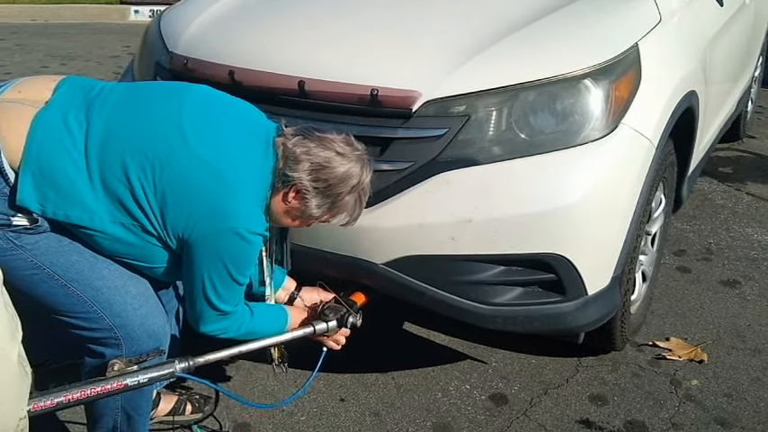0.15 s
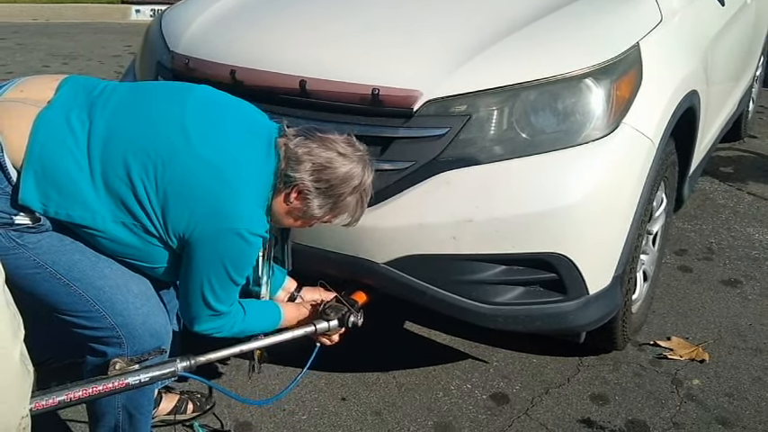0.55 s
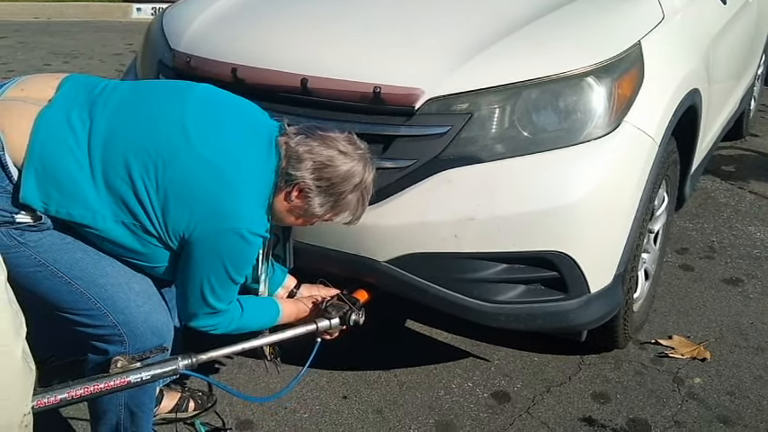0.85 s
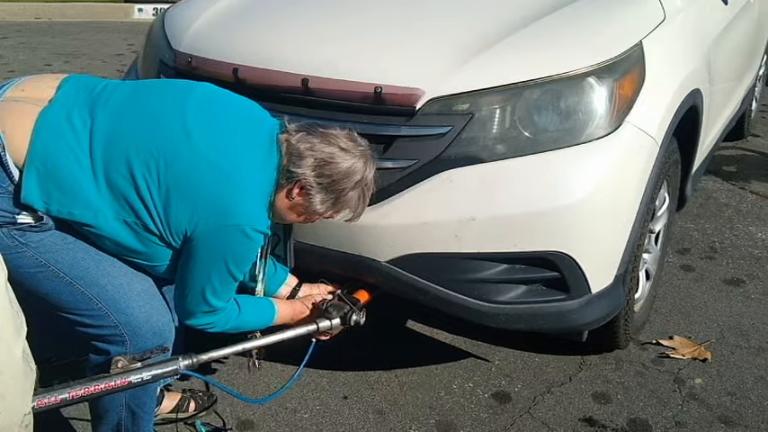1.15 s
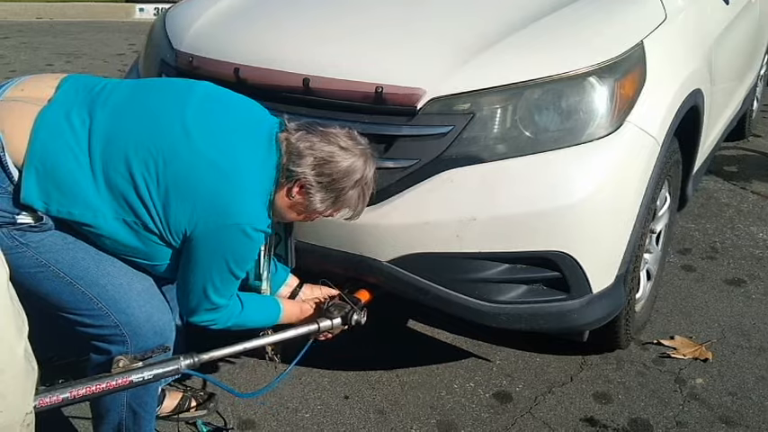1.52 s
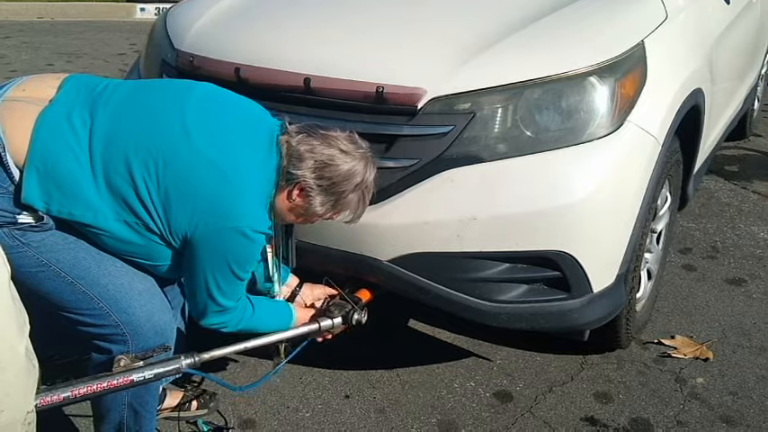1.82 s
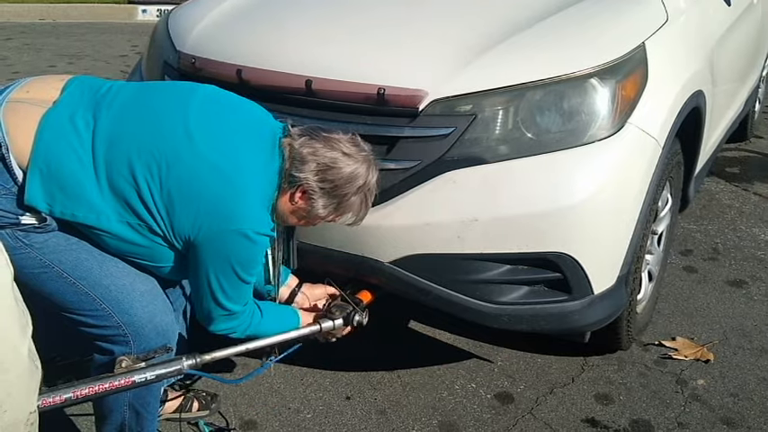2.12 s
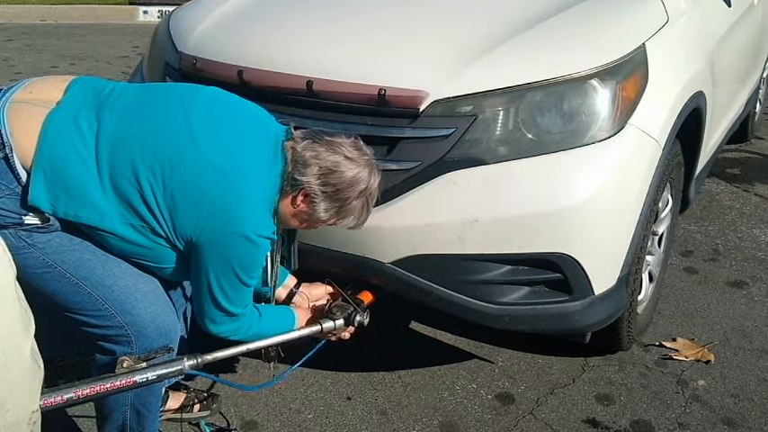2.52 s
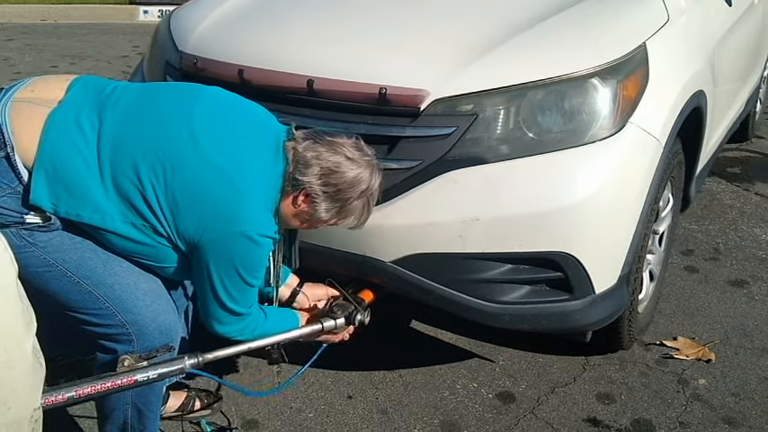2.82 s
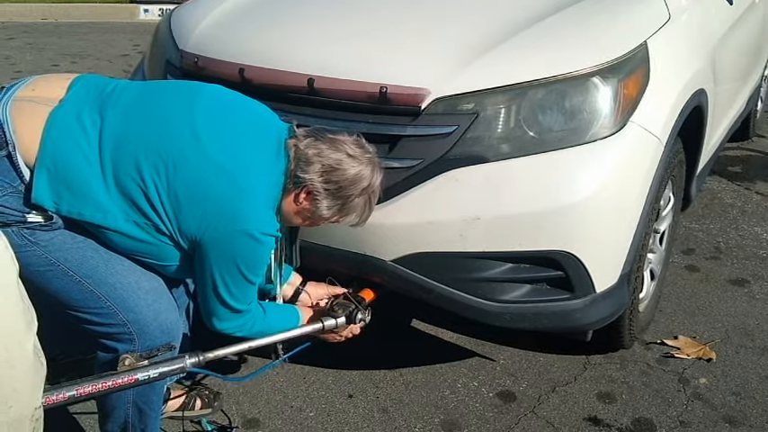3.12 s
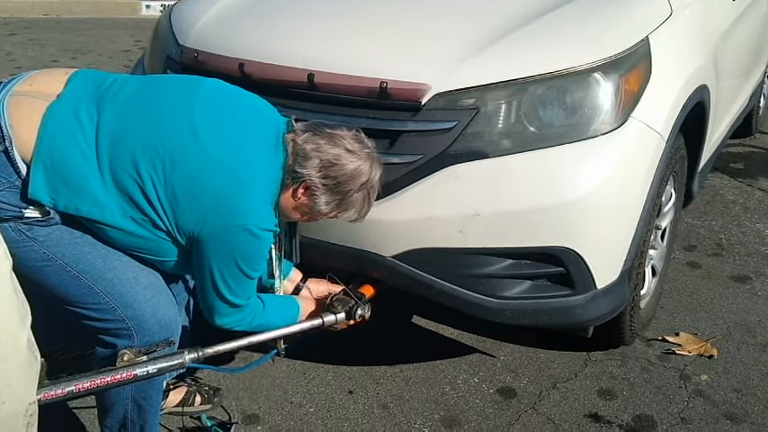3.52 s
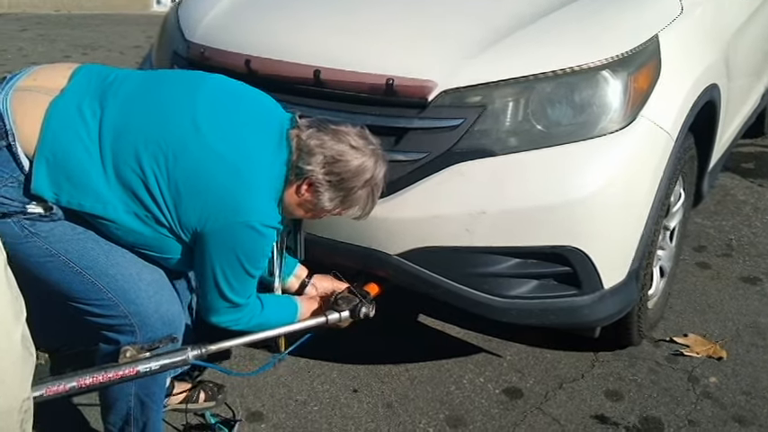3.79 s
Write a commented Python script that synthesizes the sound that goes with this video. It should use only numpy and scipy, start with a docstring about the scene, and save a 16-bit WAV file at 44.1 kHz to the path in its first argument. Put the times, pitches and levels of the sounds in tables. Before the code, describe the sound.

Metal hardware clinks and rattles as a cable hook is fastened to a tow bar near traffic.

```python
"""A steel cable and its hook are fastened to a tow bar at the front of a parked car, outdoors.
From the start the hollow bar knocks and rattles in its mount (modes plus filtered random contacts), the
cable ticks (noise bursts) and air puffs at the microphone; then birds whistle (glides) and the catch snaps
(noise plus partials). Hook clinks (click plus partials), scrapes and rubs follow; late on, the catch snaps
and the bar knocks again. Throughout: traffic wash (shaped noise) and hum (wavering sines)."""
import sys
import numpy as np
from scipy import signal
from scipy.fft import rfft, irfft
from scipy.io import wavfile
from scipy.ndimage import uniform_filter1d

SR = 44100
rng = np.random.default_rng(int(sys.argv[2]) if len(sys.argv) > 2 else 0)


def unload_audio(sound):
    """Save the sound as a 16-bit wav file, at the path given as the first command line argument."""
    columns = np.transpose(np.atleast_2d(sound))
    # keep every value between -1 and 1, then stretch to whole-number steps
    steps = np.round(np.clip(columns, -1, 1) * 32767)
    wavfile.write(sys.argv[1], SR, steps.astype(np.int16))


N = 174195


def amp(db):
    """Decibels to gain."""
    return 10 ** (np.asarray(db) / 20)


def unit(x):
    """Scales to rms 1."""
    return x / np.sqrt(np.mean(x ** 2) + 1e-20)


def read(points, hz):
    """Interpolates a (frequency, value) table on a log-frequency axis."""
    f, value = np.transpose(points)
    return np.interp(np.log(hz + 1), np.log(f + 1), value)


def add(mix, start_s, sound, pan_db=0):
    """Adds a sound at its time; positive pan_db favours the left."""
    sides = unit(amp([[pan_db / 2], [-pan_db / 2]]))
    part = mix[:, max(round(start_s * SR), 0):][:, :sound.shape[-1]]
    part += (sides * sound)[:, :part.shape[1]]


def noise(colour, size, likeness=0.31):
    """Two partly alike channels of coloured noise, rms 1."""
    hz = np.fft.rfftfreq(size, 1 / SR)
    a, b = rfft(rng.standard_normal((2, size)))
    c = np.clip(likeness, 0, 1)
    pair = np.array([a, c * a + np.sqrt(1 - c * c) * b])
    return unit(irfft(pair * amp(read(colour, hz)), size))


def drift(rate_hz):
    """Slow random motion over the whole scene, rms 1."""
    hz = np.fft.rfftfreq(N, 1 / SR)
    return unit(irfft(rfft(rng.standard_normal(N)) / (1 + (hz / rate_hz) ** 4), N))


def waver(size, rate_hz):
    """A short stretch of slow complex random motion, rms 1."""
    hz = np.fft.fftfreq(size, 1 / SR)
    z = rng.standard_normal(size) + 1j * rng.standard_normal(size)
    z = np.fft.ifft(np.fft.fft(z) * np.exp(-(hz / rate_hz) ** 2))
    return z / np.sqrt(np.mean(abs(z) ** 2))


def crack(colour, t60_s):
    """The dense, quickly dying vibration of one contact."""
    t = np.arange(SR // 2) / SR
    return noise(colour, len(t)) * amp(-60 * t / t60_s)


PORT_PHASE_RAD = 1.0  # largest random phase offset per channel


def ring(modes):
    """Decaying partials, each reaching the two microphones at its own phase."""
    t, out = np.arange(SR // 2) / SR, 0
    for hz, db, t60_s in modes:
        phase = rng.uniform(0, 2 * np.pi) + PORT_PHASE_RAD * rng.uniform(-1, 1, (2, 1))
        out = out + amp(db - 60 * t / t60_s) * np.sin(2 * np.pi * hz * t + phase)
    return out


# wash spectrum: (frequency [Hz], relative density [dB per Hz])
WASH_COLOUR = [(25, -30.5), (48, -1), (120, 1), (157, -7.5), (190, -4.5), (285, -12.5), (796, -15),
               (3820, -27.5), (5000, -32.5), (8590, -32), (16000, -36.5)]
# wash left-right likeness: (frequency [Hz], likeness [0-1])
WASH_LIKENESS = [(40, 0.143), (120, 0.843), (300, 0.842), (1000, 0.05), (3000, 0.069), (12000, 0.062)]
# engine hum: (mean frequency [Hz], level [dB])
ENGINE_HUM = [(97, -72.5), (191, -70.5)]
WASH_DB, WASH_PATCH_DB, WASH_SWELL_DB = -55.5, .9, .4


def street():
    """Distant traffic wash with drifting patches and a wavering engine hum."""
    wash = noise(WASH_COLOUR, N, read(WASH_LIKENESS, np.fft.rfftfreq(N, 1 / SR)))
    z = signal.stft(wash, nperseg=1024)[2]
    patches = uniform_filter1d(rng.standard_normal(z.shape[1:]), size=12, axis=0)  # across frequency
    patches = unit(uniform_filter1d(patches, size=7, axis=1))  # across time
    wash = signal.istft(z * amp(WASH_PATCH_DB * patches))[1][:, :N]
    hum = 0
    for mean_hz, db in ENGINE_HUM:
        level = amp(db) * (1 + 0.408 * drift(11.2))
        hz = mean_hz + 2.934 * drift(7.2)
        hum = hum + level * np.sin(2 * np.pi * np.cumsum(hz) / SR)
    return amp(WASH_DB + WASH_SWELL_DB * drift(2)) * unit(wash) + hum


# whistles: (time [s], length [s], start [Hz], middle [Hz], end [Hz], level [dB])
BIRD_WHISTLES = [(0.706, 0.091, 3520, 3413, 3390, -72.5), (1.116, 0.061, 3300, 3057, 2450, -64),
                 (1.11, 0.168, 5150, 5247, 5320, -70.5), (2.774, 0.091, 4100, 4280, 4480, -66),
                 (2.936, 0.068, 5000, 3950, 4477, -61), (3.121, 0.0577, 4150, 3750, 2810, -55.5)]


def birds():
    """Thin whistles far away: a gliding sine of wavering level, its pitch a parabola in time."""
    out = np.zeros((2, N))
    for s, length_s, start_hz, middle_hz, end_hz, db in BIRD_WHISTLES:
        u = np.linspace(0, 1, int(length_s * SR))
        hz = np.polyval(np.polyfit([0, .5, 1], [start_hz, middle_hz, end_hz], 2), u)
        turn = np.exp(2j * np.pi * np.cumsum(hz) / SR)
        flicker = 0.674 + 0.37 * waver(SR // 4, 90)[:len(u)]
        add(out, s, amp(db) * np.sin(np.pi * u) * (turn * flicker).real)
    return out


# puffs: (centre time [s], level [dB], left over right [dB])
AIR_PUFFS = [(.04, -41, 33), (0.171, -37, 26.5), (0.224, -37.5, 21), (0.36, -38.5, 23), (2.627, -41, 7),
             (3.025, -39.5, 10.5), (3.199, -34, -13.5), (3.257, -38, 14), (3.513, -41, -14.5),
             (3.904, -41.5, -4.5)]
PUFF_NOMINAL_HZ, PUFF_WIDTH_S = 76.55, 0.01257


def puffs():
    """Each puff of air pushes the microphone for a cycle or two, with low flutter."""
    out, t = np.zeros((2, N)), np.arange(-SR // 20, SR // 20) / SR
    for s, db, pan_db in AIR_PUFFS:
        hz = PUFF_NOMINAL_HZ * rng.uniform(.88, 1.12)
        wave = np.sin(2 * np.pi * (hz * t + rng.random()))
        flutter = 0.663 * noise([(40, -1), (90, 4.5), (250, -16.0), (4000, -68.5)], len(t))
        swell = np.exp(-(t / PUFF_WIDTH_S) ** 2)
        add(out, s + t[0], amp(db) * (wave + flutter) * swell, pan_db)
    return out


# dry contact spectrum: (frequency [Hz], gain [dB])
CONTACT_COLOUR = [(300, 0.5), (1500, 2.5), (4000, 6.5), (7000, 10.5), (10500, 14.5), (13000, 8),
                  (16000, -25.5)]
TICK_T60_S = .022
STRAND_RANGE_HZ, STRAND_T60_S, STRAND_DB = (3500, 13000), .045, -11


def strand(count=5):
    """One contact on the cable: a dry tick and a few short resonances, different at each spot."""
    modes = [(hz, STRAND_DB, STRAND_T60_S) for hz in rng.uniform(*STRAND_RANGE_HZ, count)]
    return crack(CONTACT_COLOUR, TICK_T60_S) + ring(modes)


# dry ticks: (time [s], level [dB])
CABLE_TICKS = [(0.0487, -42.5), (0.2268, -48.5), (0.437, -57.5), (0.802, -37), (1.3887, -40), (1.472, -51),
               (1.866, -46), (1.8945, -46.5), (1.915, -39.5), (2.071, -50), (2.267, -48.5), (2.157, -47),
               (2.2964, -47.5), (2.374, -32.5), (2.409, -34), (2.5343, -44.5), (3.0745, -50), (3.088, -45),
               (3.712, -44.5), (3.7538, -49.5)]
# strands scraping through the hook: (time [s], length [s], level [dB])
CABLE_SCRAPES = [(1.819, 0.0461, -52), (1.977, 0.1447, -57), (2.21, 0.1147, -53), (2.357, 0.0525, -48),
                 (2.463, .03, -51), (2.569, 0.0757, -54), (3.417, 0.1044, -62)]
# rubs and squeaks as the cable is drawn tight:
# (time [s], length [s], start [Hz], end [Hz], level [dB], roughness [0-1])
CABLE_RUBS = [(1.832, .045, 1680, 1880, -58, .8), (1.895, .07, 230, 150, -49, .1)]


def cable(grains_per_s=140, grain_spread_db=6, rub_width_hz=170):
    """Dry ticks, scrapes made of random strand contacts, and short gliding rubs."""
    out = np.zeros((2, N))
    for s, db in CABLE_TICKS:
        add(out, s, amp(db) * crack(CONTACT_COLOUR, TICK_T60_S))
    for s, length_s, db in CABLE_SCRAPES:
        for when, size in rng.random((round(length_s * grains_per_s), 2)):
            grain_db = db + grain_spread_db * (2 * size - 1.5)
            add(out, s + when * length_s, amp(grain_db) * strand())
    for s, length_s, start_hz, end_hz, db, rough in CABLE_RUBS:
        u = np.linspace(0, 1, int(length_s * SR))
        turn = np.exp(2j * np.pi * np.cumsum(start_hz + (end_hz - start_hz) * u) / SR)
        roughened = turn * (1 - rough + rough * waver(SR // 4, rub_width_hz)[:len(u)])
        add(out, s, amp(db) * np.sin(np.pi * u) * roughened.real)
    return out


# snaps: (time [s], level [dB], main partial [Hz], upper partial [Hz],
#         level of those two [dB], low partial [dB])
CATCH_SNAPS = [(0.8054, -21.5, 7736, 10720, -9.5, -33.5), (0.8437, -40, 7736, 10810, -8, -10.5),
               (0.8733, -40.5, 7350, 11870, -4, -9.5), (1.2666, -45, 8113, 10290, 6, -6),
               (3.9042, -18, 7946, 10610, 5, -18), (3.9097, -26, 7946, 10300, 0, 4.5)]
# fixed catch partials: (frequency [Hz], level [dB], t60 [s])
CATCH_MODES = [(5351, -14, .06), (7340, -8, .056), (12710, -10, .035)]
# snap noise spectrum: (frequency [Hz], gain [dB])
SNAP_NOISE_COLOUR = [(300, -15.5), (1500, -25.5), (3500, -15.5), (5500, -3), (7800, -2), (10500, -4),
                     (13000, 1.5), (15000, -37)]
SNAP_T60_S, CATCH_T60_S, CATCH_LOW_HZ = .03, .042, 3830


def catch():
    """The sprung catch snaps against the steel; its two main partials shift with how it is held."""
    out = np.zeros((2, N))
    for s, db, main_hz, upper_hz, ring_db, low_db in CATCH_SNAPS:
        held = [(main_hz, ring_db, CATCH_T60_S), (upper_hz, ring_db, CATCH_T60_S)]
        tone = ring(CATCH_MODES + held + [(CATCH_LOW_HZ, low_db, CATCH_T60_S)])
        add(out, s, amp(db) * (crack(SNAP_NOISE_COLOUR, SNAP_T60_S) + tone))
    return out


# bar modes, common / struck at the mount / struck at the free end:
# (nominal frequency [Hz], relative level [dB], t60 [s])
BAR_COMMON_MODES = [(980.74, 3, 0.0842), (1074.5, -6, 0.0904), (1674, -15.5, 0.182), (1893.8, -2.5, 0.052),
                    (1995.8, -4.5, 0.1008), (3064, -5.5, 0.0555), (5247, -10, 0.125)]
BAR_MOUNT_MODES = [(690.8, -10.5, 0.0552), (3398, -7.5, 0.0533)]
BAR_END_MODES = [(3857, -9.5, 0.1073), (5022, -14.5, 0.0695), (6440, -22.5, 0.172)]
# rattle spectrum: (frequency [Hz], gain [dB])
RATTLE_COLOUR = [(100, 2.5), (350, -2.5), (700, 0), (1100, -3), (2100, 4), (2700, -4.5), (3400, 0),
                 (5500, -13), (9000, -17), (15000, -31)]
# knocks: (time [s], level [dB], treble tilt [dB per octave], rattle [dB],
#          free-end modes up and mount modes down by [dB])
BAR_KNOCKS = [(0, -38, -3, -4.5, -6.5), (0.435, -64, 5, 2, 6), (0.807, -40.5, -4.5, 0, -13.5),
              (1.263, -62.5, 6, 11.5, 4), (1.652, -53, -1, 0, -16.5), (2.227, -45.5, -6.5, -2, -5.5),
              (2.381, -64.5, 6, 15, 0.5), (3.147, -48, -11.5, -7.5, 7), (3.172, -32.5, -0.5, -9.5, 7.5),
              (3.222, -36.5, -4.5, -6.5, 13), (3.243, -39.5, 3, -6.5, 7.5), (3.503, -58, 12.5, -7, -5.5),
              (3.627, -47, -0.5, -6, 4.5), (3.912, -37.5, 1, 2, 11.5), (3.936, -31, 0.5, -8, -0.5)]
BAR_BUILD_CYCLES, BAR_CHATTER, BAR_DETUNE = 11.07, .6, .008
RATTLE_RISE_S, CONTACTS_PER_S = 0.008225, 900


def bar(pivot_hz=1800):
    """A knock rings the hollow bar, low modes building slowest, while it chatters in its mount."""
    out, t = np.zeros((2, N)), np.arange(SR // 2) / SR
    octaves = np.log2(np.clip(np.fft.rfftfreq(len(t), 1 / SR), 900, 7000) / pivot_hz)
    for s, db, tilt_db, rattle_db, end_db in BAR_KNOCKS:
        tone = 0
        for table, place_db in [(BAR_COMMON_MODES, 0), (BAR_MOUNT_MODES, -end_db), (BAR_END_MODES, end_db)]:
            for nominal_hz, mode_db, t60_s in table:
                hz = nominal_hz * (1 + BAR_DETUNE * rng.uniform(-1.08, 1))
                build = 1 - np.exp(-t * hz / BAR_BUILD_CYCLES)
                chatter = abs(1 + BAR_CHATTER * waver(len(t), 76))
                tone = tone + ring([(hz, mode_db + place_db, t60_s)]) * build * chatter
        contacts = rng.standard_normal(len(t)) * (rng.random(len(t)) < CONTACTS_PER_S / SR)
        rattle = signal.fftconvolve(contacts[None], crack(RATTLE_COLOUR, 0.0084), axes=1)
        rattle = unit(rattle[:, :len(t)])
        swell = t / RATTLE_RISE_S * np.exp(1 - t / RATTLE_RISE_S)
        sound = tone + amp(rattle_db) * rattle * swell
        tilted = irfft(rfft(sound) * amp(tilt_db * octaves), len(t))
        add(out, s, amp(db) * tilted[:, :SR // 3])
    return out


# clinks: (time [s], level [dB], low partials [dB], singing partials [dB],
#          high partial [dB], top partial [dB], contact click [dB])
HOOK_CLINKS = [(1.16, -54.5, -14.5, -32, -9, -12, 1), (1.705, -48, -22.5, -40, -1, -13.5, 0.5),
               (1.9685, -20.5, -9, -40.5, -19.5, -9, -11), (2.014, -28, -16, -32.5, -22, -14, -7),
               (2.2036, -44.5, 2.5, -3, -9, 4.5, 0), (2.313, -41, -22.5, -43.5, -9.5, -14, -4.5),
               (2.3474, -29, -16.5, -41, -22, -8, -5.5), (2.5697, -23.5, -4, -31.5, -26, -10, -6.5),
               (2.617, -41, -17.5, -1, 7, 1, -3), (2.9522, -46.5, -24, -21.5, 1.5, -12.5, -2),
               (3.1056, -25, -13.5, -33, -1, -7, -14.5), (3.2611, -41, -22, -34, -2, -28, 0.5),
               (3.6072, -59, 11.5, -24.5, -17.5, -2.5, 10), (3.8544, -39, -2.5, -2.5, -0.5, -2.5, -9.5),
               (3.937, -28, -9, -24.5, -7.5, -11, -4.5)]
# hook partials by group: (frequency [Hz], level [dB], t60 [s])
LOW_PARTIALS = [(3880, -11, .055), (4790, -13, .025), (5515, -12, .05), (7570, -9, .075)]
MAIN_PARTIALS = [(10205, -2, .05), (10290, -2, .028), (10780, -5, .022)]
SINGING_PARTIALS = [(6724, 1, .06), (8410, 0, .46)]
HIGH_PARTIAL = [(13090, 0, .09)]
TOP_PARTIAL = [(14308, 0, .22)]
CLICK_T60_S = .024
GRIP_S = 0.1  # the fingers soon close on the hook and stop its top partial


def hook():
    """Each clink is a click and a ring; where it is struck decides which partials speak."""
    out, t = np.zeros((2, N)), np.arange(SR // 2) / SR
    grip = np.exp(-(t / GRIP_S) ** 4)
    for s, db, low_db, sing_db, high_db, top_db, click_db in HOOK_CLINKS:
        tone = ring(MAIN_PARTIALS)
        tone += amp(low_db) * ring(LOW_PARTIALS)
        tone += amp(sing_db) * ring(SINGING_PARTIALS)
        tone += amp(high_db) * ring(HIGH_PARTIAL)
        tone += amp(top_db) * grip * ring(TOP_PARTIAL)
        click = amp(click_db) * crack(CONTACT_COLOUR, CLICK_T60_S)
        add(out, s, amp(db) * (tone + click))
    return out


# the metalwork lies to the right, most clearly in the treble: (frequency [Hz], left over right [dB])
METAL_SIDE = [(300, -2.5), (1300, -1.5), (2400, -5.5), (4400, -4.5), (8000, -1.5), (14000, -17.5)]
RIGHT_DELAY_S = .000018


def ports(x):
    """The two microphone ports differ in level and slightly in arrival time."""
    hz = np.fft.rfftfreq(N, 1 / SR)
    side = amp(read(METAL_SIDE, hz))
    delay = np.exp(-2j * np.pi * hz * RIGHT_DELAY_S)
    pair = np.array([side, delay]) * np.sqrt(2 / (1 + side ** 2))  # keeps total power
    return irfft(rfft(x) * pair, N)


# outdoor tail: (frequency [Hz], t60 [s])
TAIL_T60 = [(200, 0.24), (4000, 0.0845), (9000, 0.0643), (15000, 0.046)]
TAIL_DB, NEAR_DB, NEAR_DECAY_S = -10, -25, 0.06


def surroundings(x):
    """Close reflections from bumper and asphalt, plus a short faint outdoor tail."""
    size = SR // 3
    t = np.arange(size) / SR
    sparse = rng.standard_normal((2, size)) * (rng.random((2, size)) < .04)
    near = sparse * (t > .001) * np.exp(-t / NEAR_DECAY_S)
    hz, when, z = signal.stft(rng.standard_normal((2, size)) * (t > .008), SR, nperseg=256)
    decay = amp(-60 * when / read(TAIL_T60, hz)[:, None])
    tail = signal.istft(z * decay)[1][:, :size]
    echo = (amp(NEAR_DB) * unit(near) + amp(TAIL_DB) * unit(tail)) / np.sqrt(size)
    return x + signal.fftconvolve(x, echo, axes=1)[:, :N]


def scene():
    """The metalwork close by, the street behind; puffs and street get no echo."""
    metalwork = ports(hook() + catch() + cable() + bar())
    return surroundings(metalwork + birds()) + puffs() + street()


LOW_CUT_HZ, EDGE_HZ = 42, 16300


def record(dry):
    """The recorder's low cut and band limit."""
    dry = signal.sosfilt(signal.butter(4, LOW_CUT_HZ, "high", fs=SR, output="sos"), dry)
    band = signal.firwin(255, EDGE_HZ, window=("kaiser", 8), fs=SR)
    return signal.oaconvolve(dry, band[None], "same")


dry = scene()
out = record(dry)
unload_audio(out)
```